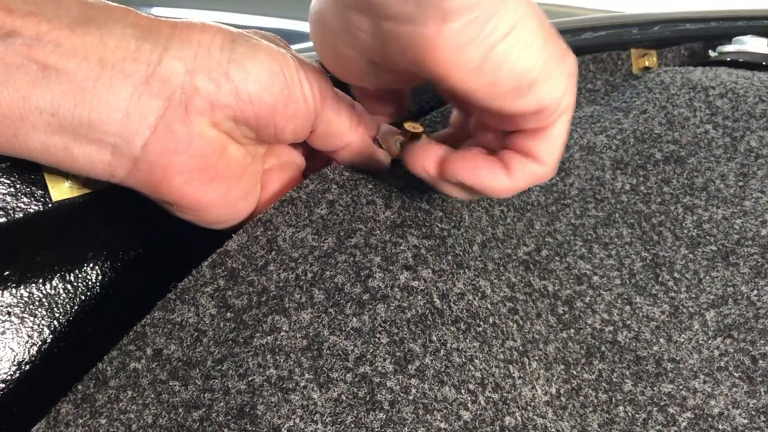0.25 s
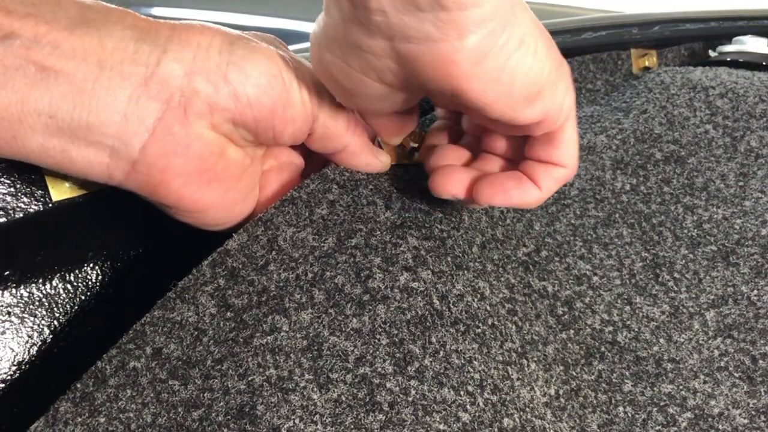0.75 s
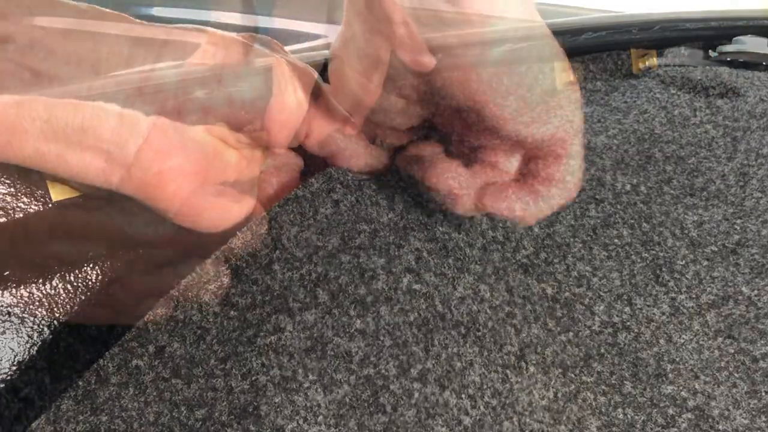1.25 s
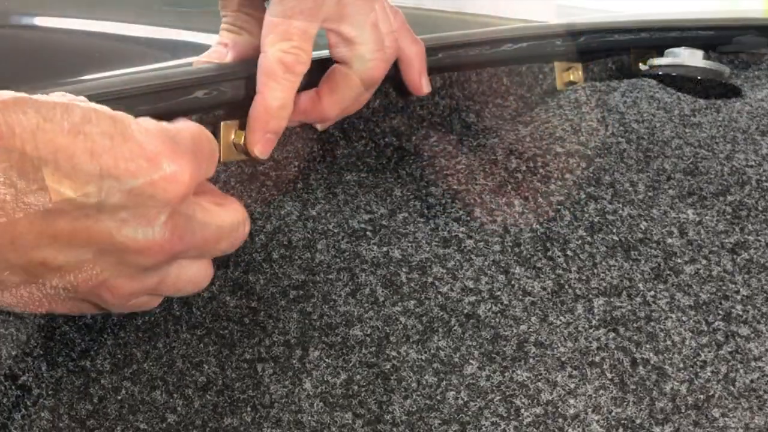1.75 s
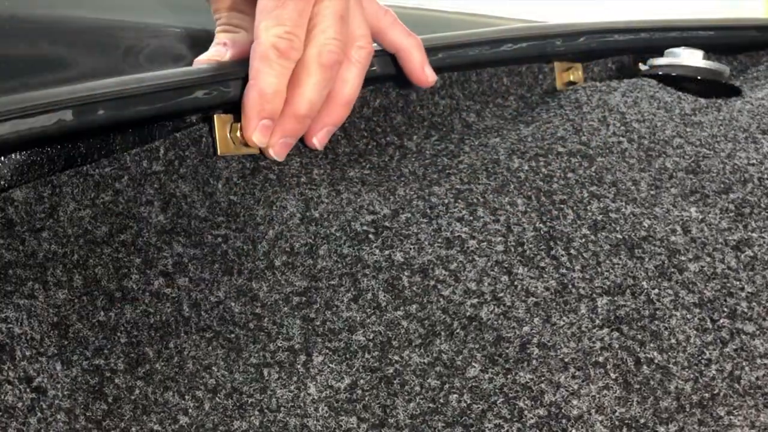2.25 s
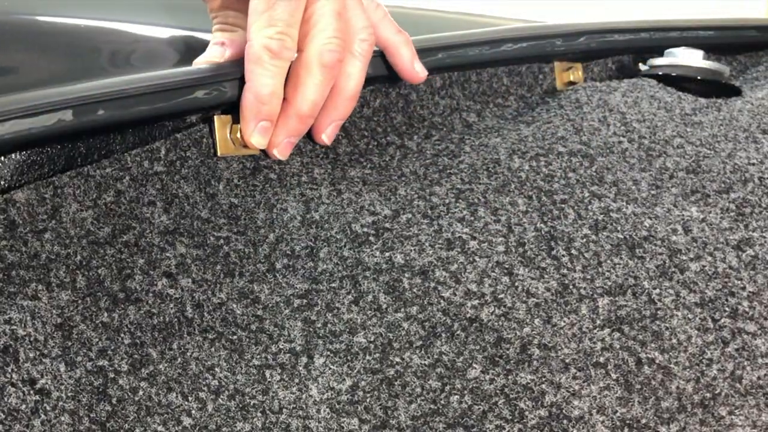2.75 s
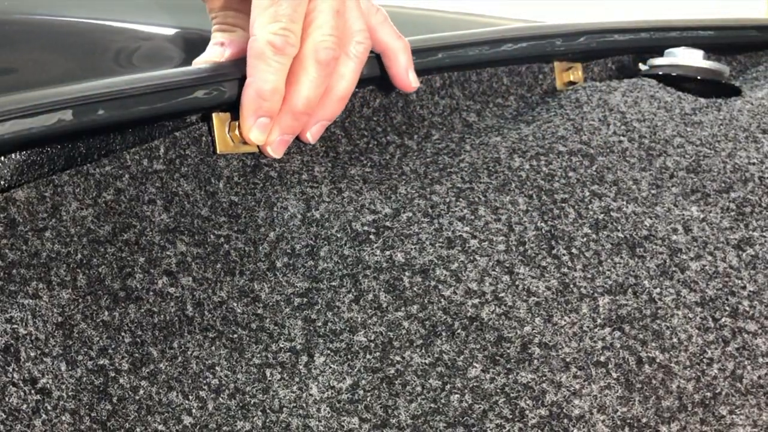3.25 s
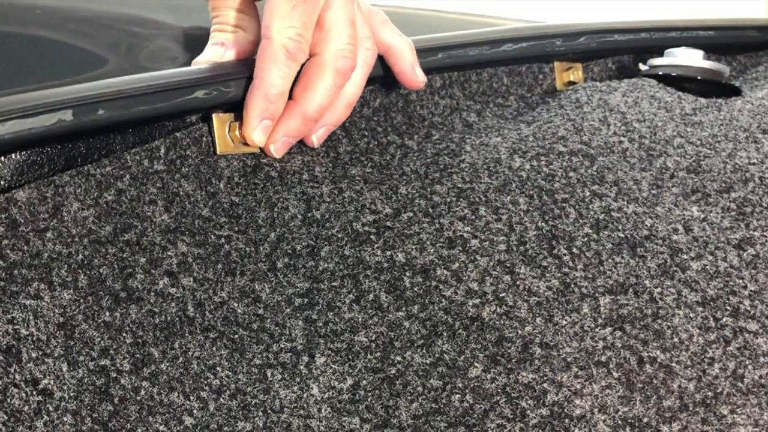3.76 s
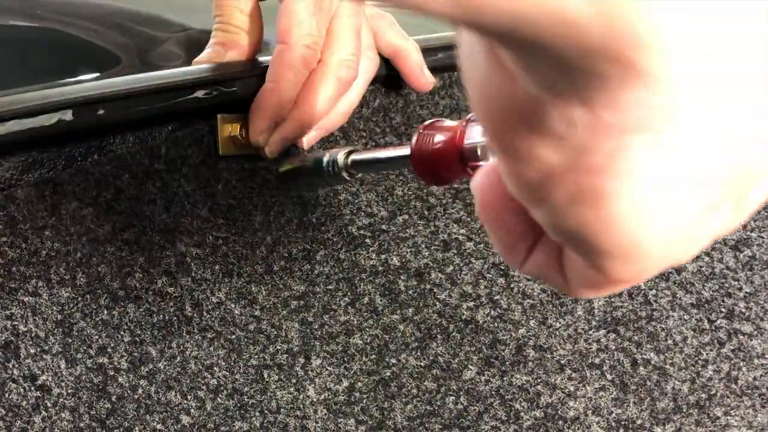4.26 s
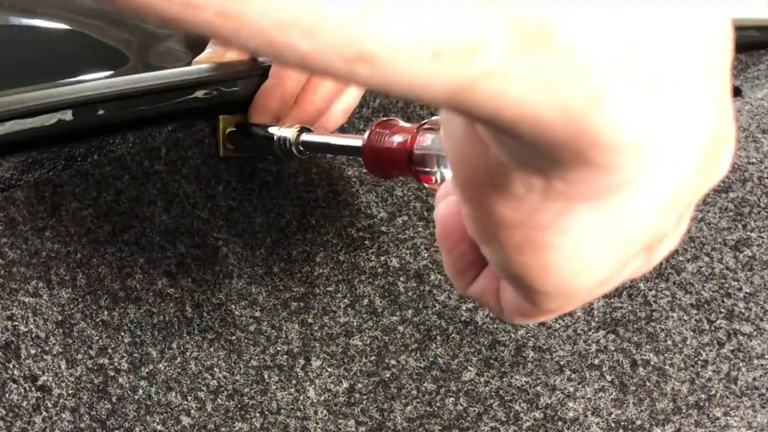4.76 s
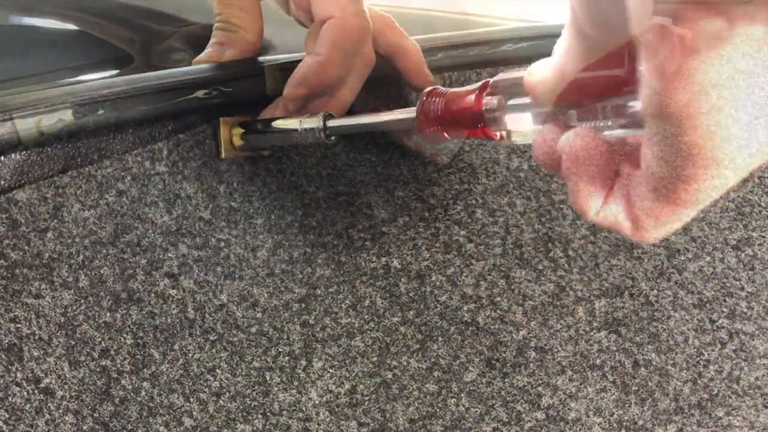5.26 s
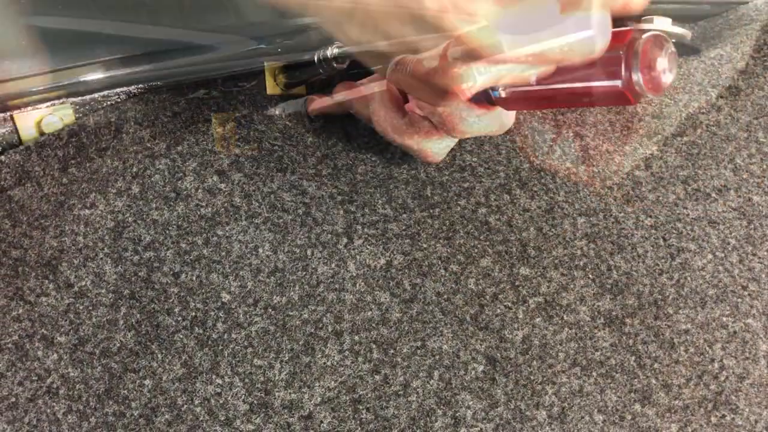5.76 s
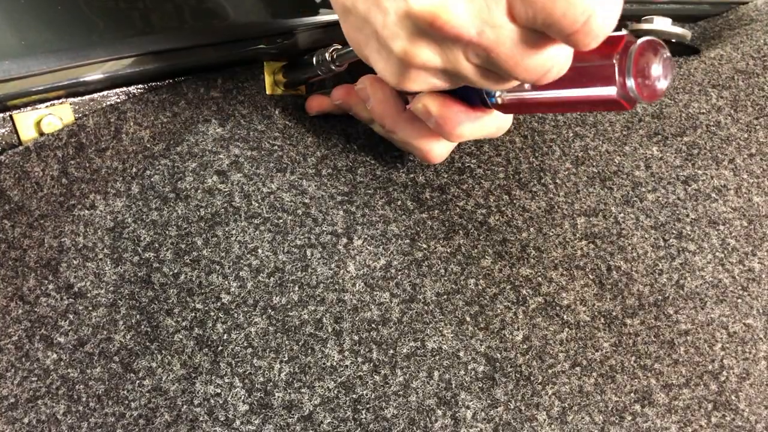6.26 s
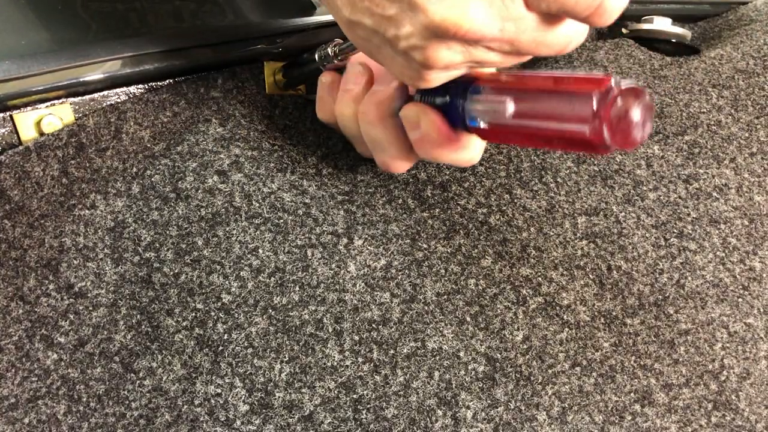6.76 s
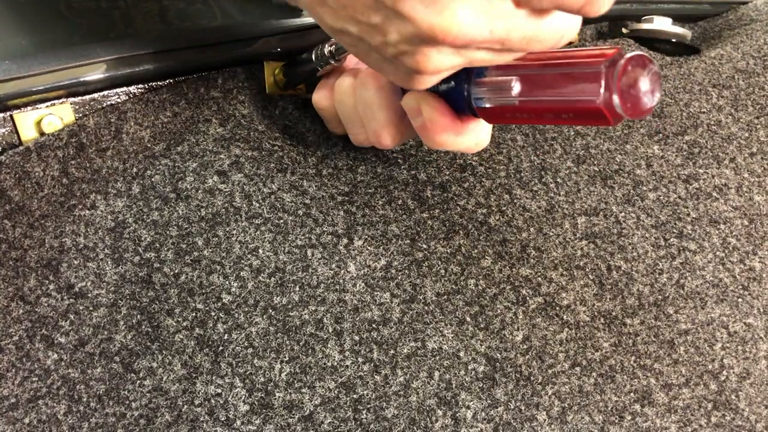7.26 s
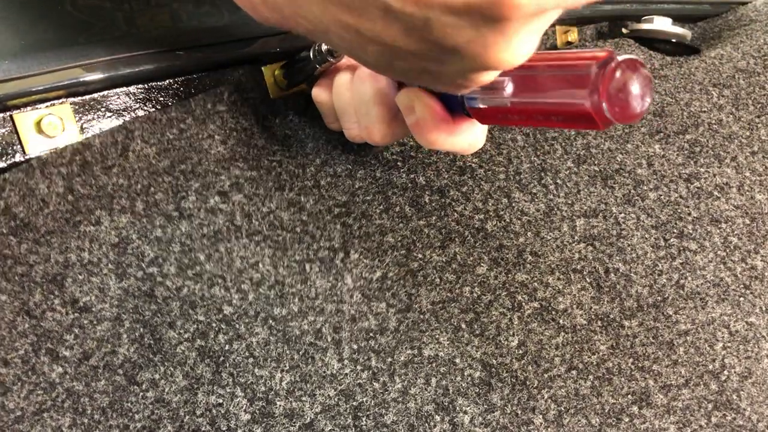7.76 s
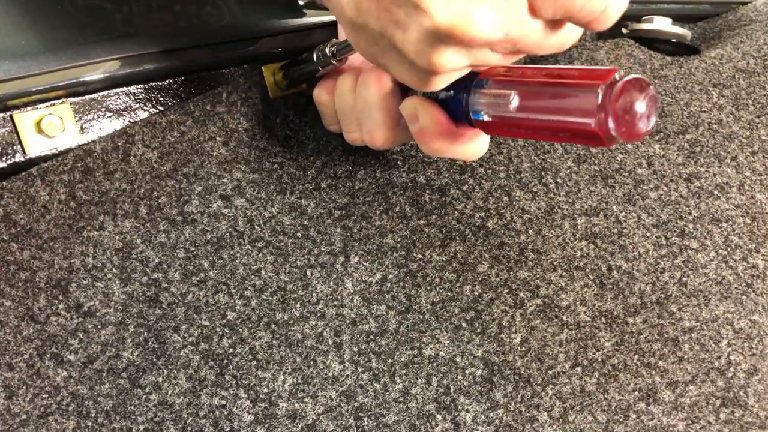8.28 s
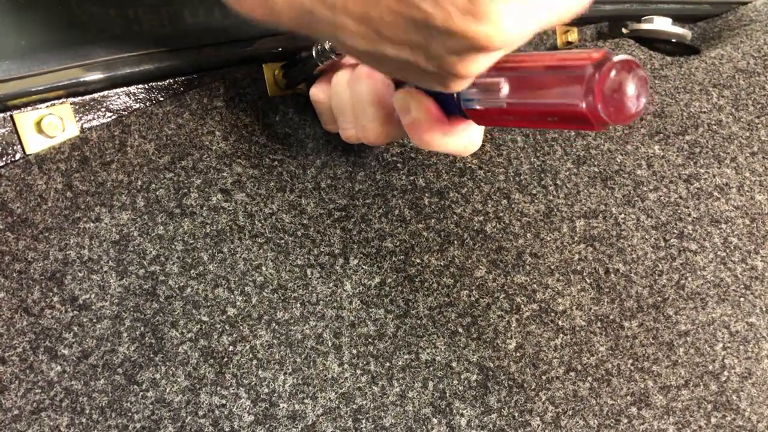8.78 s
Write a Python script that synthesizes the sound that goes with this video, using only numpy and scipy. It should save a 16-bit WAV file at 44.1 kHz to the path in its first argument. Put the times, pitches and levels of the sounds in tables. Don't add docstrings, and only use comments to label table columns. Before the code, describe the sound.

From the start two motors drone low in a workshop, their close tones beating in a regular, several-times-a-second throb, with thin whines and a broad rush of ducted air. A small click comes at 0.9 seconds and a brass clip snaps at 1.8. Light ticks at 2.5 precede a very soft palm push at 2.8. At 3.1 a driver scrapes grainily, drops at 3.2 with quick bounces and a dull heavy knock, and a thin high steel ring follows, damped at 4.3. Sharp metallic ticks cluster at 3.3 and from 3.8 to 4.2; the tip seats in a screw at 4.6 and more softly at 4.8. From 5.0 to 6.0 the motors fade to one faint steady drone. A muffled thump falls at 5.2, faint touches at 5.9, a soft knock at 7.1, a brighter clicking knock at 8.0, and barely audible taps at 8.5 and 8.9.

```python
import sys
import numpy as np
from scipy import signal
from scipy.fft import rfft, irfft, next_fast_len
from scipy.io import wavfile

SR = 44100
rng = np.random.default_rng(int(sys.argv[2]) if len(sys.argv) > 2 else 0)


def log_audio(samples):
    frames = np.atleast_2d(samples).T
    limited = np.clip(frames, -1, 1)
    pcm = np.round(limited * 32767).astype(np.int16)
    wavfile.write(sys.argv[1], SR, pcm)


def gain_from_db(level_db):
    decades = np.asarray(level_db, float) / 20
    return 10 ** decades


N = 397782
T = np.arange(N) / SR


def chatter(t60, spike_db=0.):
    t = np.arange(SR // 6) / SR
    grains = rng.standard_normal(len(t)) * gain_from_db(4 * rng.standard_normal(len(t)))
    decay_db = spike_db * np.exp(-t / 0.0023) - 60 * t / t60
    return grains * gain_from_db(decay_db) * np.minimum(t / 0.00066, 1)


def ring(force, modes, scatter_db):
    out = np.zeros(len(force))
    for hz, db, t60 in modes:
        radius = gain_from_db(-60 / (t60 * SR))
        angle = 2 * np.pi * hz / SR
        gain = gain_from_db(db + scatter_db * rng.standard_normal())
        poles = [1, -2 * radius * np.cos(angle), radius ** 2]
        out += signal.lfilter([0, gain * np.sin(angle)], poles, force)
    return out


def butter(x, order, hz, kind="low"):
    return signal.sosfilt(signal.butter(order, hz, kind, fs=SR, output="sos"), x)


def band(x, hz, octaves):
    edges = np.clip(hz * 2. ** (np.array([-.5, .5]) * octaves), 50, .45 * SR)
    return butter(x, 2, edges, "band")


def add(out, s, sound):
    i = round(s * SR)
    out[i:i + len(sound)] += sound[:N - i]


def drift(rate):
    r = np.exp(-80 * np.pi * rate / SR)
    slow = signal.lfilter([1], [1, -2 * r, r * r], rng.standard_normal(N // 40 + 2002))[2000:]
    return np.interp(np.arange(N) / 40, np.arange(len(slow)), slow / slow.std())


# (frequency [Hz], level [dB], decay T60 [s])
SHAFT = [(3420, -1, .012), (3780, 0, .012), (4500, -5, .006), (5700, 0, .006), (6310, 3, .008),
         (6930, 1, .007)]


def tick(out, s, db, hz, t60, handle_db, tip_db):
    snap_db = 0.9 * max(db + 20, 0)
    force = chatter(1.2 * t60, spike_db=5 + snap_db)
    handle = gain_from_db(handle_db) * ring(force, SHAFT[:3], 2.0)
    tip = gain_from_db(tip_db) * ring(force, SHAFT[3:], 2.0)
    crackle = band(band(force, hz, 1.3), hz, 1.3)
    add(out, s, gain_from_db(db - 4.0) * (crackle + gain_from_db(-19.5) * band(handle + tip, 6500, 1.75)))


# (time [s], level [dB], crackle centre [Hz], handle end ring [dB], tip end ring [dB])
DRIVER_TICKS = [(2.575, -37, 10900, -6, -10), (3.33, -23, 7000, 3, -13), (3.337, -23.5, 8500, 5, 6.5),
                (3.342, -25.5, 8500, 6, -6), (3.345, -20.5, 9100, -4, -18), (3.8345, -17, 10000, -9, -12),
                (3.839, -27, 8000, 4, -16), (3.937, -30, 8000, -10, 7), (3.9406, -15.5, 8000, 3.5, 2.5),
                (3.9536, -18, 8500, -2, 2), (3.964, -13, 9200, -2.5, -0.5), (4.0446, -19, 8000, 1, -21),
                (4.163, -22, 7000, -18, 5), (4.165, -14.5, 8000, -3, 0), (4.2023, -16, 7500, -3, -3.5),
                (4.6175, -26.5, 7040, 5, 2), (4.775, -41, 6000, -14, -13), (5.0244, -18.5, 6560, 1, -1),
                (5.7854, -40, 4970, -7, -13), (5.8965, -47, 6000, -14, -4), (6.338, -54, 8000, -10, 5.5)]


def driver_ticks(out):
    for s, db, hz, handle_db, tip_db in DRIVER_TICKS:
        t60 = 0.06 * np.exp(-0.06 * max(db + 20, 0))
        tick(out, s, db, hz, t60, handle_db, tip_db)


# (time [s], level [dB], crackle centre [Hz])
STRAY_TICKS = [(0.943, -25, 11800), (1.7996, -31, 9420), (2.515, -30, 12000), (3.258, -39, 11500),
               (5.144, -30, 5960), (6.444, -43, 11000), (6.82, -49, 10000), (7.1142, -44, 4000),
               (7.9608, -29, 9000), (8.78, -58, 12000), (8.898, -43, 5000), (8.9311, -44, 3030)]


def stray_ticks(out):
    for s, db, hz in STRAY_TICKS:
        tick(out, s, db, hz, t60=.021, handle_db=-26, tip_db=-26)


# (time [s], level [dB])
SCREW_SEATS = [
    (4.6186, -20),
    (4.7743, -25),
]
# (frequency [Hz], level [dB], decay T60 [s])
SCREW = [(1013, -3, .03), (1146, -2.5, .03), (3030, 2, .012), (4400, 1, .008), (6120, 1, .01)]


def screw_seats(out):
    for s, db in SCREW_SEATS:
        add(out, s, gain_from_db(db - 20) * ring(chatter(0.035), SCREW, 1.0))


# (frequency [Hz], level [dB], decay T60 [s])
CLIP = [(4300, -4, .025), (4770, -1, .022), (5070, -4, .018)]


def clip_snap(out):
    snap_s, snap_db = 1.8013, -14
    add(out, snap_s, gain_from_db(snap_db - 23) * ring(chatter(0.035), CLIP, 0))


# (frequency [Hz], level [dB], decay T60 [s])
FLOOR = [(196, 4.5, 0.15), (261, 3, 0.086), (297, -4, 0.089)]


def palm_lean(out):
    lean_s, lean_db = 2.792, -16.5
    push = np.pad(np.hanning(60), (0, SR // 5))
    add(out, lean_s, gain_from_db(lean_db - 34.5) * band(ring(push, FLOOR, 0), 232, 0.81))


def small_contacts():
    out = np.zeros(N)
    for play in (driver_ticks, stray_ticks, screw_seats, clip_snap, palm_lean):
        play(out)
    return butter(out, 2, 13500)


def blows(rows, body, low_modes):
    out = np.zeros(N)
    for s, db, cut_hz, damping, low_db in rows:
        sound = np.zeros(SR // 6)
        for hz, level_db, t60 in body:
            sound += gain_from_db(level_db) * np.sqrt(4000 / hz) * band(chatter(t60 * damping), hz, 0.82)
        push = np.abs(chatter(0.0055))
        sound += gain_from_db(low_db - 29) * ring(push, low_modes, 3.6)
        add(out, s, gain_from_db(db) * butter(sound, 2, cut_hz))
    return out


# (time [s], level [dB], contact cut-off [Hz], damping factor on T60 [1], low ring [dB])
TRAY_BLOWS = [
    (3.1966, -14.5, 13000, 0.73, -15),
    (3.2075, -19, 7000, 0.36, -8),
    (3.2145, -20.5, 7000, 0.57, -11),
    (3.2215, -8, 1800, 0.54, -4.5),
    (3.2615, -21.5, 2500, 0.34, 4.5),
    (4.6184, -29, 3320, 0.51, -17),
    (4.7745, -27, 3320, 0.75, -11),
    (5.0235, -44, 4000, 0.72, -16),
    (5.8965, -44.5, 4000, 0.54, 7.5),
]
# (centre [Hz], level [dB], decay T60 [s])
TRAY = [(250, 0.5, 0.26), (523, -10.5, 0.24), (950, -2, 0.24), (2000, 4, 0.19), (4000, 9, 0.14),
        (8000, -6.5, 0.11), (13000, -21, .03)]
# (frequency [Hz], level [dB], decay T60 [s])
TRAY_LOW = [(205, 1, 0.12), (320, 2, 0.082), (550, 6.5, 0.093), (726, 15, 0.083), (1000, -4, .07),
            (1435, 4, 0.15), (2360, 5, 0.07)]


def tray():
    return blows(TRAY_BLOWS, TRAY, TRAY_LOW)


# (time [s], level [dB], contact cut-off [Hz], damping factor on T60 [1], low ring [dB])
PANEL_BLOWS = [
    (5.8965, -43, 2000, 0.72, -1),
    (5.17, -28.5, 150, 1.03, 4),
    (7.119, -34, 900, 0.71, -6),
    (7.9608, -24, 7060, 0.51, -1.5),
    (8.45, -39, 800, 0.41, -4),
    (8.93, -42.5, 1480, 1.3, -8),
]
# (centre [Hz], level [dB], decay T60 [s])
PANEL = [(249, -2.5, 0.17), (497, -1.5, 0.32), (950, 1, .15), (1800, 5.5, 0.25), (4000, 4, 0.14),
         (8000, 11.5, 0.065), (13000, -9, 0.028)]
# (frequency [Hz], level [dB], decay T60 [s])
PANEL_LOW = [(94.5, 5, 0.4), (150, 2, 0.25), (226, 0, .08)]


def panel():
    return blows(PANEL_BLOWS, PANEL, PANEL_LOW)


def drag():
    start_s, end_s = 3.07, 3.198
    grains = rng.standard_normal(N) * gain_from_db(5.7 * rng.standard_normal(N))
    pressed = np.clip((T - start_s) / .03, 0, 1) * np.clip((end_s - T) / .006 + 1, 0, 1)
    level = pressed * gain_from_db(-23 + 60 * np.clip(T - end_s, -1, 0))
    dull = band(band(grains, 1200, 3), 1200, 3)
    return level * (dull + gain_from_db(-16) * band(grains, 5000, 1.5))


BIT_HZ = [4204, 7133, 11760, 12110]
# (level [dB], decay T60 [s], loss when brushed [dB])
BIT = [(-27.5, 2.6, -2.5), (-29.5, 1.3, -5.5), (-45, .9, -5), (-45, 1.8, -2)]


def bit():
    struck_s, brushed_s, held_s = 3.258, 3.335, 4.3
    t = np.maximum(T - struck_s, 0)
    brushed = np.clip((T - brushed_s) / .012, 0, 1)
    ping_db = 4 * np.exp(-t / .03) - 8 * np.exp(-((T - brushed_s - .025) / .025) ** 2)
    rung = np.zeros(N)
    for hz, (db, t60, loss_db) in zip(BIT_HZ, BIT):
        rung += gain_from_db(db + ping_db - 60 * t / t60 + loss_db * brushed) * np.sin(2 * np.pi * hz * t)
    return rung * np.minimum(t / 0.0057, 1) * gain_from_db(-60 * np.maximum(T - held_s, 0) / .1)


def hum(tones, wobble_db):
    out = np.zeros(N)
    for hz, db, s in tones:
        out += gain_from_db(db + wobble_db * drift(1.0)) * np.cos(2 * np.pi * hz * (T - s))
    return out


def whine(lines, wobble_db, wander):
    out = np.zeros(N)
    for hz, db in lines:
        phase = 2 * np.pi * hz * T + wander * drift(1.55)
        out += gain_from_db(db + wobble_db * drift(6.3)) * np.cos(phase)
    return out


def air(spectrum, ducts, bright_db, patchy_db):
    size = next_fast_len(N)
    hz = np.maximum(np.arange(size // 2 + 1) * SR / size, 1)
    corner_hz, corner_db = np.transpose(spectrum)
    level_db = np.interp(np.log(hz), np.log(corner_hz), corner_db)
    for centre, width, db in ducts:
        level_db += db / (1 + (2 * (hz - centre) / width) ** 2)
    noise = rfft(rng.standard_normal(size)) * gain_from_db(level_db) * np.sqrt(SR / 2)
    octave = np.log2(hz / 4000)
    together = drift(12.0)
    out = np.zeros(N)
    for k in range(-7, 3):
        octave_band = irfft(noise * np.clip(1 - np.abs(octave - k), 0, 1), size)[:N]
        flicker_db = patchy_db * (.5 * together + drift(23.0))
        out += octave_band * gain_from_db(bright_db * np.clip(1 + k / 3, 0, 1.5) + flicker_db)
    return out


# (frequency [Hz], peak
# level [dB], moment in step [s])
LOUD_TONES = [(57.243, -40.5, .06), (55.31, -41, .06), (171.73, -29, .03), (165.93, -30, .03),
              (110.63, -42, .17), (108.89, -40, .17), (120, -45, 0)]
# (frequency [Hz], peak level [dB])
LOUD_WHINE = [(1115.6, -44), (801, -53), (915, -58), (1030, -51), (1085, -55), (1716, -57), (1830, -58),
              (1945, -58), (2300, -61)]
# (frequency [Hz], density [dB per Hz])
LOUD_AIR = [(25, -84), (40, -79), (50, -64), (75, -56.5), (130, -61), (250, -66), (340, -67.5),
            (700, -68.5), (1250, -73.5), (2700, -75), (5500, -77.5), (8500, -85.5), (12000, -96),
            (14000, -99), (16200, -104)]
# (frequency [Hz], width [Hz], gain [dB])
LOUD_DUCT = [(96, 15, 4), (70, 10, -5), (130, 6.5, 0.5), (150, 4.7, 11), (172.7, 25.6, 13),
             (210.6, 25.6, 8.5), (379, 34, 5.5), (506.6, 50, 8.5), (592, 52, 7.5), (746, 16, 5),
             (1062, 136, 7), (1757, 15, 10), (2064, 120, 4)]


def running_pair(pair_db):
    bright_until_s, bright_gone_s = 1.05, 1.45
    early = np.clip((bright_gone_s - T) / (bright_gone_s - bright_until_s), 0, 1)
    bright_db = 0.66 * early - 0.24 * pair_db
    first = hum(LOUD_TONES[:2], 1.2)
    third = gain_from_db(0.19 * pair_db) * hum(LOUD_TONES[2:4], .7)
    second = gain_from_db(-1) * hum(LOUD_TONES[4:], 3.5)
    rush = air(LOUD_AIR, LOUD_DUCT, bright_db, patchy_db=.4)
    return first + second + third + whine(LOUD_WHINE, 1.2, .7) + rush


# (frequency [Hz], peak level [dB], phase moment [s])
QUIET_TONES = [(57.11, -49, 0), (114.3, -59, 0), (171.36, -45.5, 0), (109.15, -53, 0)]
# (frequency [Hz], peak level [dB])
QUIET_WHINE = [(1118.5, -53), (801, -65), (915, -70), (1085, -62), (1657, -74), (1770, -71), (1829, -66),
               (2455, -72)]
# (frequency [Hz], density [dB per Hz])
QUIET_AIR = [(25, -95), (40, -80), (50, -77), (75, -75), (130, -82.5), (250, -82), (340, -81), (700, -81.5),
             (950, -85), (1300, -86), (2300, -91.5), (4000, -95.5), (8000, -105), (13000, -111),
             (16200, -115)]
# (frequency [Hz], width [Hz], gain [dB])
QUIET_DUCT = [(96, 35, 9.8), (172.5, 40, 18), (218, 15, 9.1), (274, 11, 3.9), (558, 91, 8.5),
              (795, 36, 4.5), (1076, 74, 13), (1800, 54, 4.2), (2690, 100, 1)]


def lone_motor():
    rush = air(QUIET_AIR, QUIET_DUCT, 0, patchy_db=.3)
    return hum(QUIET_TONES, .7) + whine(QUIET_WHINE, 1.5, .6) + rush


# (time [s], level [dB])
PAIR_LEVEL = [(0, .5), (.4, -.5), (.8, 1), (1.5, -2.5), (1.9, 0), (2.7, 1.5), (3.1, 1), (3.5, 1), (4.3, 1),
              (4.7, 1.5), (5, 1), (5.3, 4.5)]


def motors():
    pair_db = np.interp(T, *np.transpose(PAIR_LEVEL))
    fade_start_s, fade_end_s = 5.045, 6.06
    fade = np.clip((T - fade_start_s) / (fade_end_s - fade_start_s), 0, 1)
    return gain_from_db(pair_db) * (1 - fade) ** 1.31 * running_pair(pair_db) + fade * lone_motor()


def room(x):
    t = np.arange(SR // 2) / SR
    tail = rng.standard_normal(len(t)) * gain_from_db(-60 * t / 0.31) * (t > .003)
    tail = butter(tail, 1, 2200)
    return x + gain_from_db(-13.5) * signal.fftconvolve(x, tail / np.linalg.norm(tail))[:N]


def scene():
    hands = small_contacts() + tray() + panel() + drag()
    hands = butter(hands, 2, 75, "high")
    return (room(hands) + bit() + motors())[None]


def roll_off(x):
    return signal.sosfilt(signal.butter(12, 16510, fs=SR, output="sos"), x)


def record(dry):
    x = butter(dry, 2, 40, "high")
    x = signal.sosfilt(signal.cheby2(10, 40, 16200, fs=SR, output="sos"), x)
    return roll_off(x)


dry = scene()
out = record(dry)
log_audio(out)
```